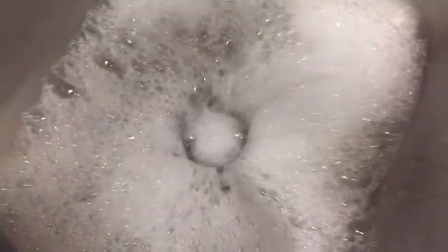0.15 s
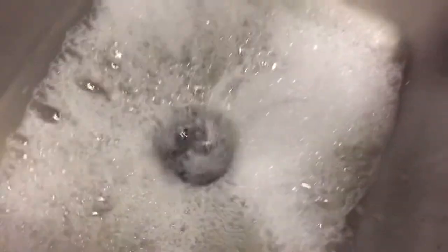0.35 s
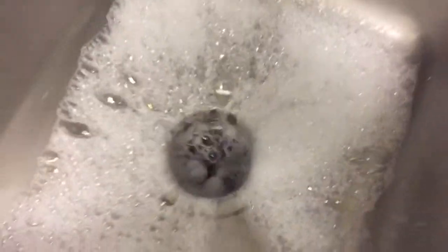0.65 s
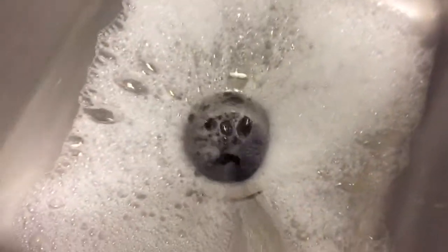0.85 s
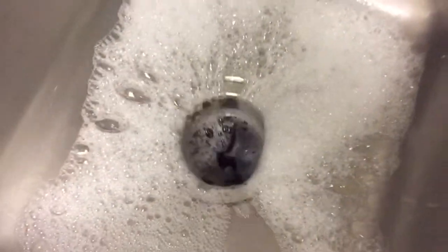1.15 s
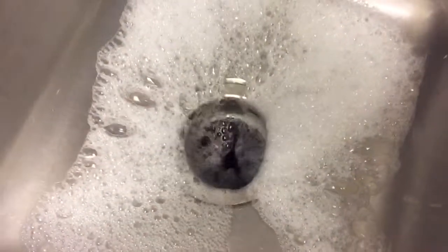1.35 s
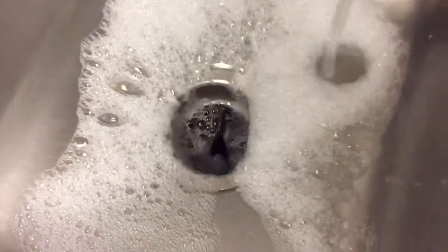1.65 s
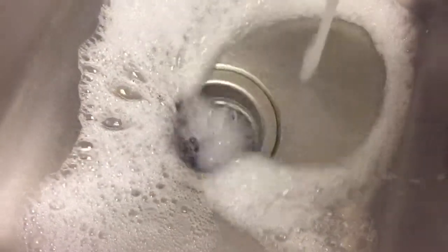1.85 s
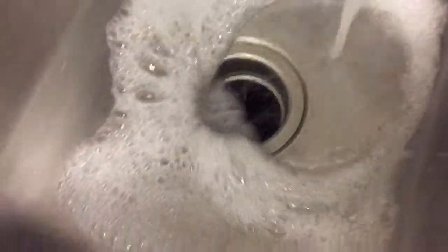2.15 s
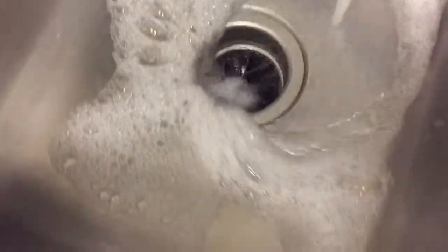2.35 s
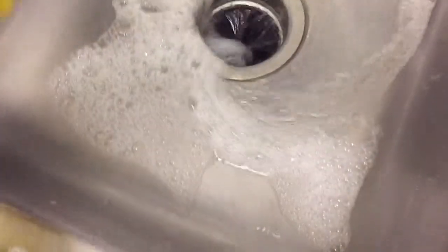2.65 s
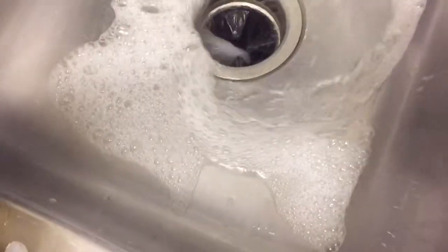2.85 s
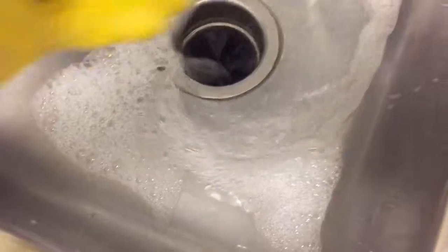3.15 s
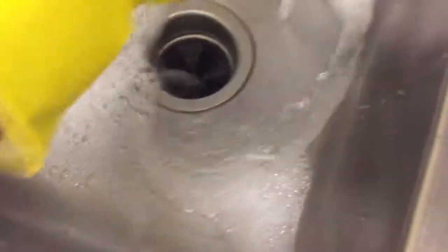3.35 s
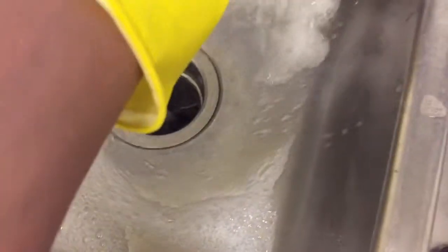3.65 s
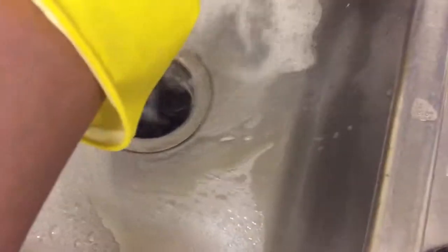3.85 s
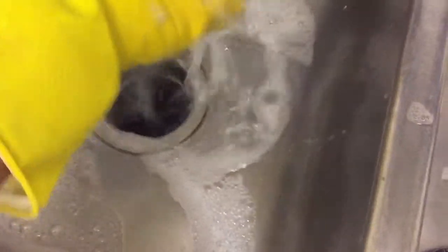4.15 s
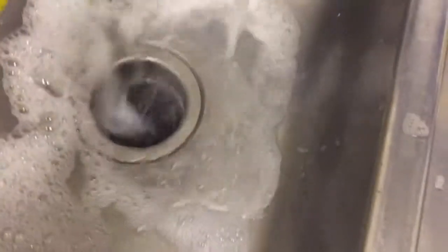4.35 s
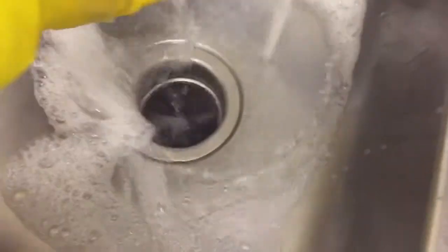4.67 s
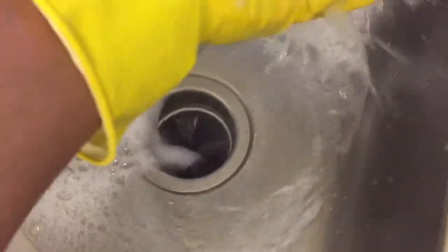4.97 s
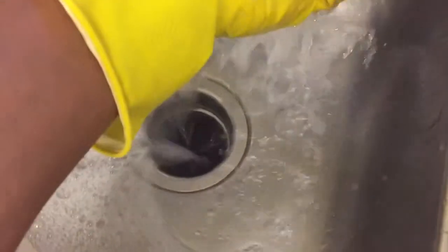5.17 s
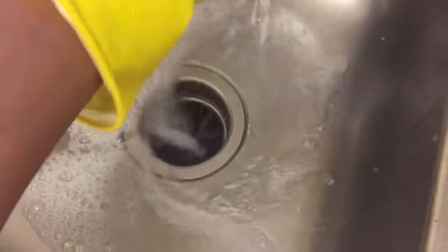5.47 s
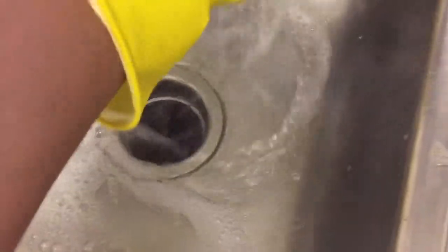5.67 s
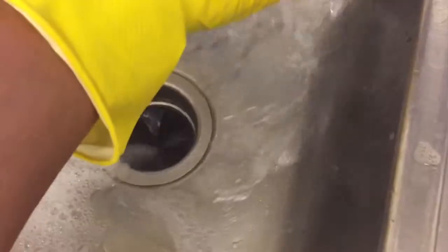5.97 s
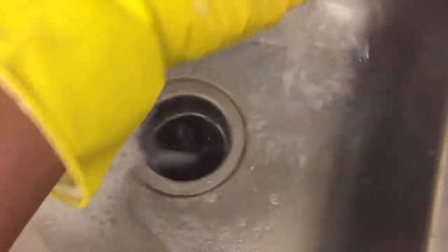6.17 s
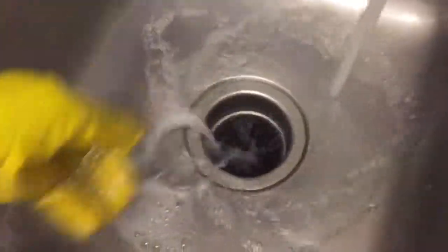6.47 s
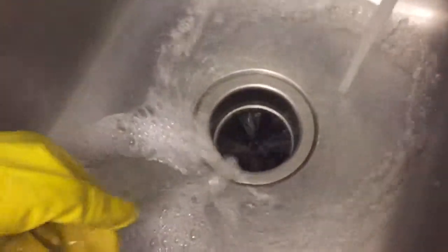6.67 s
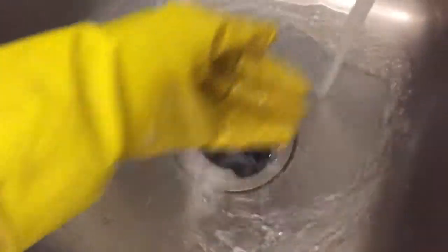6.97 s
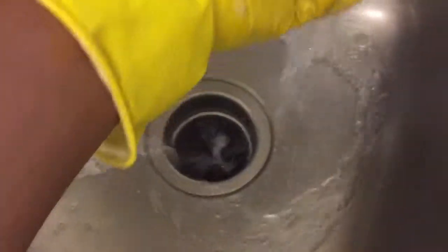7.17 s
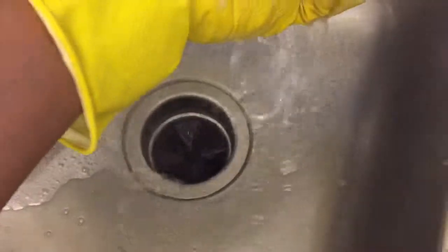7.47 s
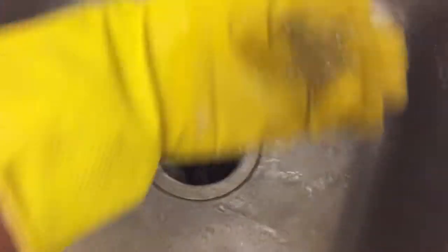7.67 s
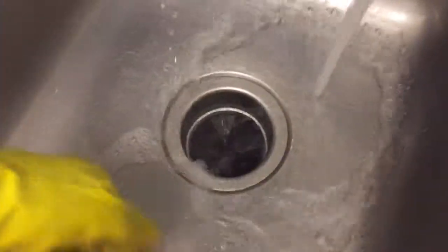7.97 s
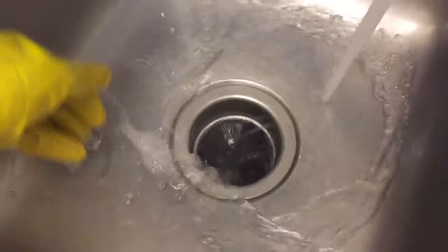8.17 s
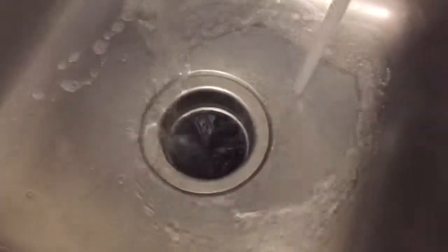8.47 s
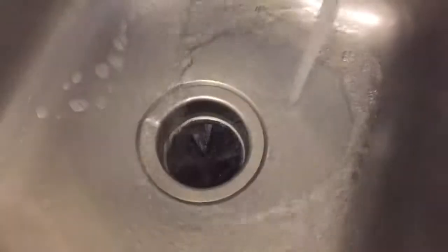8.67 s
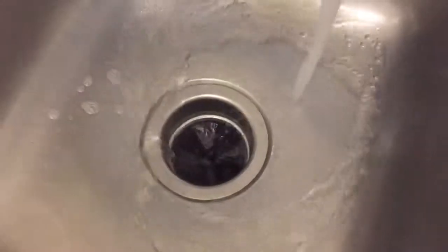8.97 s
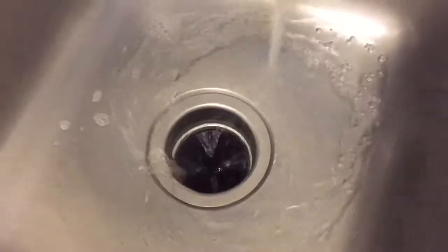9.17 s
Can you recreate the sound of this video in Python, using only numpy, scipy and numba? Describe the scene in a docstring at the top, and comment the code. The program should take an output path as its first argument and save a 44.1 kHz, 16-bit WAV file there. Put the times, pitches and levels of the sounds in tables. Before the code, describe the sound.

Steady electric disposal hum with gurgling, churning water, a sharp crack early on, then wet shredding, slurps and increasingly bright splashing in a metal sink.

```python
"""A garbage disposal runs under a steel sink while the tap pours in. The motor hums at twice the mains rate,
water and fruit churn in the chamber and ring its cavities, and hard pieces crack against the grind ring.
At first foamy water covers the drain and muffles it; as that is sucked away the bright spray comes through.
Sine tones make the hum, the gulps and the ring of the steel; random blows and noise through resonances make
the grinding, slurps, rattle and hiss; shaped noise makes the spray and the snaps."""
import sys
import numpy as np
from scipy import signal
from scipy.fft import rfft, irfft
from scipy.io import wavfile
from scipy.ndimage import uniform_filter1d
from numba import njit

SR = 44100
rng = np.random.default_rng(int(sys.argv[2]) if len(sys.argv) > 2 else 0)


def pcm_store(signal):
    """Save signal as 16-bit PCM."""
    levels = np.round(np.clip(np.atleast_2d(signal), -1, 1) * 32767)
    wavfile.write(sys.argv[1], SR, levels.astype(np.int16).T)


N = 411012
T = np.arange(N) / SR


def undb(db):
    """Decibels to gain."""
    return 10 ** (np.asarray(db) / 20)


def unit(x):
    """Scale to rms 1."""
    return x / np.sqrt(np.mean(x ** 2))


def curves(rows):
    """The columns of a table, joined by straight lines in time."""
    s, *columns = np.transpose(rows)
    return [np.interp(T, s, column) for column in columns]


def add(out, s, sound):
    """Mix a sound in at time s."""
    i = max(int(s * SR), 0)
    out[i:i + len(sound)] += sound[:N - i]


def colour(x, points, size=8192):
    """Causal minimum-phase filter with a spectrum of (Hz, dB) points; rms 1."""
    hz, db = np.transpose(points)
    log_hz = np.log(np.fft.rfftfreq(size, 1 / SR) + 1)
    log_gain = np.log(undb(np.interp(log_hz, np.log(hz), db)))
    cepstrum = irfft(log_gain)[:size // 2]
    cepstrum[1:] *= 2
    response = irfft(np.exp(rfft(cepstrum, size)))
    return unit(signal.fftconvolve(x, response)[:N])


@njit
def svf(x, hz, width):
    """State-variable band-pass whose centre may move."""
    y, band, low = np.empty(len(x)), 0., 0.
    for i in range(len(x)):
        g, k = np.tan(np.pi * hz[i] / SR), width / hz[i]
        v = (band + g * (x[i] - low)) / (1 + g * (g + k))
        band, low, y[i] = 2 * v - band, low + 2 * g * v, k * v
    return y


def resonate(x, hz, width):
    """A resonance with steep skirts: two band-passes in a row."""
    centre = hz + np.zeros(N)
    return svf(svf(x, centre, float(width)), centre, float(width))


def walk(rate):
    """Smooth chance with a spread near 1, drawn afresh at the given rate in Hz."""
    k = int(SR / rate)
    steps = np.repeat(rng.standard_normal(N // k + 1), k)
    return unit(uniform_filter1d(steps, k)[:N])


def impacts(rate, spread_db):
    """Random tiny blows, rate per second, their sizes spread in dB; rms 1."""
    hit = rng.random(N) < rate / SR
    size = undb(spread_db * np.minimum(rng.exponential(size=N), 5))
    return unit(hit * size * np.sign(rng.standard_normal(N)))


def surges(rate, decay_s, depth):
    """Each lump caught by a lug gives a sudden burst that dies away; a gain of rms 1."""
    lumps = np.abs(impacts(rate, spread_db=2.2)) * np.sqrt(rate / SR)
    lumps = np.minimum(lumps, 2)  # no lump is over twice the usual size
    bursts = signal.lfilter([1], [1, -np.exp(-1 / (decay_s * SR))], lumps)
    return unit(1 + depth * unit(bursts))


def burst(noise, s, decay_s):
    """A piece of noise that starts at once and dies away, with the energy of its envelope."""
    fade = np.exp(-T[:SR // 4] / decay_s)
    i = int(s * SR)
    piece = fade * noise[i:i + len(fade)]
    return piece * np.linalg.norm(fade) / np.linalg.norm(piece)


def slurp(rush, hz, width, waver):
    """Rushing noise rings a gap between air and water, whose size keeps changing; rms 1."""
    return unit(resonate(rush, hz * (1 + waver * walk(25)), width))


def ring(x, modes, waver):
    """Several resonances driven together, each retuned by sloshing water; rms 1."""
    total = np.zeros(N)
    for hz, width, db in modes:
        slosh = 1 + waver * walk(14)
        total += undb(db) * resonate(x, hz * slosh, 1.094 * width)  # a little wider than listed
    return unit(total)


def foam(bite):
    """A dense crackle of bubbles and pulp; rms 1."""
    crackle = impacts(rate=3500, spread_db=3.5) + 0.5 * rng.standard_normal(N)
    return unit(bite ** 1.27 * crackle)


def bubbles(hz, rate, spread, cycles, rise):
    """Single bubbles ring near a moving pitch, each gliding up as it dies; rms 1."""
    out, t = np.zeros(N), T[:SR // 40]
    for when, pitch, size in rng.random((int(rate * N / SR), 3)):
        turns = hz[int(when * N)] * (1 + spread * (2 * pitch - 1)) * t
        age = turns / cycles
        swell = np.exp(-age) - np.exp(-4 * age)
        tone = np.sin(2 * np.pi * turns * (1 + rise * age))
        add(out, when * N / SR, undb(-14 * size) * swell * tone)
    return unit(out)


def loads():
    """Each load swells, holds and drains away: the lifts in dB of pulp, air and water."""
    # Water and pulp that slide into the drain, lifting the grinding (pulp), the low note of the mouth (air)
    # and the collar hiss (water). Each layer takes only a share of a lift.
    # Each row: start in seconds, length in seconds, pulp lift in dB, air lift in dB, water lift in dB.
    load_rows = [(0.11, 0.055, 11, 13, -12), (0.415, 0.058, 8, -1, 16), (0.8, 0.77, 9.5, -1, 16.5),
                 (1.763, 0.16, 11, 13, 11), (2.23, 0.14, 9.5, 14, 9), (2.744, 0.24, 3, 15, 8),
                 (2.97, 0.63, 4.5, 13.5, 9), (3.595, 0.33, 3.5, 10, 6.5), (3.898, 0.065, 2, 14, 9),
                 (4.462, 0.38, 3.5, 2.5, 4.5), (4.95, 0.48, 4.5, -6, 4.5), (5.714, 0.28, 7, -2, -1.5),
                 (5.97, 0.25, 8, 2, 4), (6.43, 0.54, 2.5, 7, 6.5), (6.984, 0.052, 16, 13, 11),
                 (7.246, 0.13, 8.5, -2, 6), (7.39, 0.28, 7, -1, 2), (7.686, 0.14, 2.5, 6, 0),
                 (7.78, 0.064, 4, 9, -3), (8.115, 0.18, 2, 8, 4.5), (8.5, 0.13, 1, 14, 3)]
    attack_s, release_s = 0.062, 0.067
    pulp, air, water = np.zeros((3, N))
    for s, length, pulp_db, air_db, water_db in load_rows:
        swell = np.interp(T, [s, s + attack_s], [0, 1])
        drain = np.interp(T, [s + length, s + length + release_s], [1, 0])
        shape = swell * drain
        pulp += pulp_db * shape
        air += air_db * shape
        water += water_db * shape
    return pulp, air, water


def drive(law, lift):
    """Gain of a layer from the depth of the water and the load passing through."""
    # The sink drains, and a sweep of the hand floods the drain again.
    # Each row: time in seconds, water depth from 0 to 1.
    depth_rows = [(0, 0.55), (.7, 0.66), (1.5, 0.62), (2.05, 0.29), (3.9, 0.4), (4.15, 0.47), (4.4, 0.17),
                  (5.6, 0.31), (6.4, 0.1), (7.2, 0.25), (7.9, 0.06), (9.32, 0)]
    empty_db, flooded_db, share = law
    depth, = curves(depth_rows)
    return undb(empty_db + flooded_db * depth + share * lift)


def motor():
    """Magnetic hum at twice the mains rate; the rotor shakes the sink while it is flooded."""
    # The hum sinks around the hardest crack and slowly recovers. Each row: time in seconds, rms level in dB.
    hum_rows = [(0, -18), (1.38, -19.5), (1.59, -23.5), (1.78, -21.5), (2.55, -21.5), (2.9, -19.5),
                (4.1, -19.5), (4.6, -18), (5.1, -18.5), (9.32, -18.5)]
    hum_hz, rotor_hz, rotor_db = 119.96, 55.2, -35.5
    hum_db, = curves(hum_rows)
    hum_level = undb(hum_db + 0.58 * walk(24))
    hum = hum_level * np.sin(2 * np.pi * hum_hz * T + 0.06 * walk(7.4))
    flooded = np.interp(T, [.65, 1.2], [1, .12])
    shake = undb(rotor_db + 2 * walk(24)) * flooded * np.sin(2 * np.pi * rotor_hz * T)
    return np.sqrt(2) * (hum + shake)


def grinding(pulp, air, bite):
    """Bits of fruit pelt the chamber and ring its cavities and the air in the drain mouth."""
    # Cavities of the grinding chamber. Each row: pitch in Hz, nominal width in Hz, level in dB.
    cavities = [(475.3, 25.7, 2.5), (586.3, 53, -4), (635.6, 77, 2), (728, 46, -6.5), (908.6, 97, -1.5),
                (1291, 125, -10), (1614, 118, -5)]
    # The upper resonance drifts higher as the mouth clears. Each row: time in seconds, pitch in Hz.
    mouth_pitch = [(0, 1740), (.75, 1780), (.95, 1730), (1.45, 1790), (3.2, 1844), (4.8, 1820), (5.7, 1827),
                   (6.2, 1853), (9.32, 1847)]
    # Foam smothers the mouth at first, and again whenever more is washed in.
    # Each row: time in seconds, gain of the upper note from 0 to 1.
    mouth_clear = [(.6, 0.25), (.78, 0.97), (1.5, 1), (1.7, 0.4), (2.05, 0.4), (2.65, 0.6), (2.95, 0.9),
                   (3.98, 1), (4.15, 0.8), (4.4, 1)]
    # Layer answers for chamber, lower note and upper note.
    # Each holds: level in the empty sink in dB, change under full depth in dB, share of a load's lift.
    grind_law = (-32, -1.1, 0.26)
    lower_law = (-45, -4, 0.74)
    upper_law = (-36, -7.5, 0.79)
    blows = bite * (impacts(rate=1100, spread_db=2.5) + 0.58 * rng.standard_normal(N))
    chamber = ring(blows, cavities, waver=0.024) * drive(grind_law, pulp)
    slosh = 1 + 0.026 * walk(16)  # moving water keeps retuning the mouth
    lower = unit(resonate(blows, 1280 * slosh, width=156)) * drive(lower_law, air)
    upper_hz, = curves(mouth_pitch)
    opened, = curves(mouth_clear)
    flutter = bubbles(upper_hz, rate=160, spread=0.055, cycles=9, rise=0.0016)
    note = unit(resonate(blows, upper_hz * slosh, width=138))
    upper = opened * unit(note + undb(0.5) * flutter) * drive(upper_law, pulp)
    return chamber + lower + upper


def churning(pulp):
    """Water is beaten round the tub in dull thumps."""
    # Spectrum of the tub full of water. Each row: frequency in Hz, level in dB.
    tub_spectrum = [(25, -39), (45, -25), (62, -9.5), (84, -6), (100, -5.5), (135, -6.5), (184, 5),
                    (225, -8), (275, -4), (320, -10), (410, -13.5), (600, -20.5), (1100, -31.5),
                    (3000, -76)]
    # Level in the empty sink in dB, change under full depth in dB, share of a load's lift.
    churn_law = (-25, 5.9, 0.21)
    return drive(churn_law, pulp) * colour(impacts(rate=900, spread_db=1.5), tub_spectrum)


def cracks(tail_db=-17, tail_s=0.051):
    """A hard piece snaps, and the blow rings the plate and basin."""
    # Hard pieces that strike the grind ring. Each row: time in seconds, snap level in dB, steel ring level in dB.
    strikes = [(1.472, -18, -31), (1.490, -27, -35), (1.512, -27, -33), (1.543, -27, -23), (1.595, -9, -15),
               (1.687, -26, -44), (1.793, -27, -33)]
    # Ring of the grind plate and basin. Each row: pitch in Hz, level in dB, 60 dB decay time in seconds.
    steel_modes = [(170, -3, .17), (342, -4, .2), (491, 7, 0.13), (620, 2.5, 0.04), (730, 9.5, 0.07),
                   (800, -4, .07), (1105, -12, 0.36), (1330, -8.5, 0.19), (1610, -11, .07),
                   (1945, -23, 0.23), (2655, -16, .2), (2240, -9, .04)]
    # Spectrum of the snap. Each row: frequency in Hz, level in dB.
    snap_spectrum = [(100, -20), (400, 2), (1000, 12.5), (1400, 5), (1800, 9), (2200, 7), (2750, 7.5),
                     (3200, 3), (3600, 8), (4200, 4.5), (5200, -1), (6200, -2), (8000, -7), (15000, -8)]
    ring_lag_s = 0.00234  # the steel answers just after the snap
    out, t = np.zeros(N), T[:SR // 4]
    crunch = colour(rng.standard_normal(N), snap_spectrum)
    for s, snap_db, ring_db in strikes:
        snap = burst(crunch, s, decay_s=.006)
        tail = undb(tail_db) * burst(crunch, s, tail_s)
        # each blow lands on another spot and shares itself differently among the modes
        steel = np.zeros(len(t))
        for hz, db, t60 in steel_modes:
            fade = undb(db + rng.normal() - 60 * t / t60)
            steel += fade * np.sin(2 * np.pi * hz * t) * rng.choice([-1, 1])
        add(out, s, undb(snap_db) * (snap + tail))
        add(out, s + ring_lag_s, undb(ring_db) * steel * (1 - np.exp(-t / 0.0011)))
    return out


def shreds(attack_s=0.00057):
    """A lug tears through a soft piece: a short rasp of tiny blows rings the mouth and the collar."""
    # Soft pieces shredded under the open mouth.
    # Each row: start in seconds, level in dB, decay in seconds, collar level against the mouth in dB.
    pieces = [(0.128, -26.5, 0.011, -17), (0.8035, -20.5, 0.0057, -16), (0.829, -25, .008, -13),
              (2.387, -23, .007, -6), (2.826, -21, 0.006, -4), (2.914, -30, .008, -4),
              (3.044, -20, 0.0083, 1.5), (3.137, -22.5, 0.01, 0), (3.158, -20.5, 0.0056, -0.5),
              (3.186, -17, 0.0085, -6), (3.227, -16.5, 0.0055, -6), (3.472, -23, 0.0094, -1),
              (3.492, -24.5, 0.016, 0), (3.551, -21.5, 0.014, -1), (3.620, -19, 0.013, -8),
              (3.740, -19, 0.018, -6), (3.828, -18, 0.006, -7), (3.922, -19.5, 0.008, -5),
              (3.975, -23, 0.013, -4), (4.036, -22, 0.0057, -13), (4.34, -22.5, 0.0065, -12),
              (5.17, -25, .007, -6), (5.291, -19, .007, -7), (5.97, -18, .007, -17),
              (6.046, -22, 0.008, -5), (6.153, -14.5, 0.01, -4), (6.686, -24.5, 0.0068, -3),
              (7.163, -23.5, .01, -2), (7.432, -20, 0.012, 2), (7.554, -17, 0.0082, 1.5),
              (7.7993, -20, 0.0057, -6), (7.840, -19, .005, -9), (7.848, -16, 0.006, -1.5),
              (8.446, -22.5, .007, -4), (8.55, -22, 0.0091, -5)]
    # What a piece rings, in the mouth and in the collar. Each row: pitch in Hz, nominal width in Hz, level in dB.
    mouth_modes = [(895, 120, -5), (1322, 230, 1), (1693, 130, 2.5), (1822, 114, 5.5), (1956, 86, 1)]
    collar_modes = [(2610, 450, 0.5), (3404, 130, 4), (3720, 210, 10), (5140, 1400, -18), (6160, 1600, 6.5),
                    (7970, 2200, 3.5)]
    out, rasp = np.zeros(N), impacts(rate=4000, spread_db=2.5)
    mouth = ring(rasp, mouth_modes, waver=0.036)
    collar = ring(rasp, collar_modes, waver=0.036)
    attack = 1 - np.exp(-T[:SR // 4] / attack_s)
    for s, db, decay_s, bright_db in pieces:
        torn = burst(mouth, s, decay_s) + undb(bright_db) * burst(collar, s, decay_s)
        add(out, s, undb(db) * attack * torn)
    return out


def gulps(glide=1.8):
    """Swallowed pockets of air and soft lumps each ring for a few cycles, rising a little."""
    # Each row: start in seconds, starting pitch in Hz, level before the soft onset in dB, 60 dB decay in seconds.
    pockets = [(0.145, 174, -12, .1), (1.547, 296, -0.5, 0.03), (3.495, 199, -9, 0.092),
               (3.986, 190, -11, 0.098), (6.160, 197, -7.5, 0.06), (6.205, 196, -11, 0.1),
               (7.655, 457, -19, 0.063), (7.995, 554, -15.5, .05), (8.352, 568, -11, 0.058),
               (8.571, 994, -3, 0.032), (8.572, 1230, -11, 0.02), (8.573, 760, -16, .025)]
    out, t = np.zeros(N), T[:SR // 8]
    for s, hz, db, t60 in pockets:
        envelope = undb(db - 60 * t / t60) * (1 - np.exp(-t / 0.002))
        add(out, s, envelope * np.sin(2 * np.pi * hz * t * (1 + glide * t)))
    return out


def vortex():
    """Air slurps and bubbles through two gaps in the foam; the higher one climbs as the water runs off."""
    # The wider gap, which gurgles as the drain first opens, then the narrower gap that opens in the vortex.
    # Each row: time in seconds, resonance in Hz, level in dB.
    wide_gap = [(0, 890, -35), (.41, 875, -52), (.465, 860, -30), (.6, 940, -30), (.7, 1010, -36),
                (.82, 1040, -36), (.95, 1064, -39), (1.6, 1060, -70)]
    narrow_gap = [(0, 3000, -46.5), (.3, 2890, -47), (.5, 3000, -44), (.76, 2970, -44.5), (.88, 3260, -39),
                  (1.1, 3940, -40), (1.24, 3880, -38.5), (1.36, 4300, -36.5), (1.55, 4420, -42),
                  (1.9, 4720, -54)]
    low_hz, low_db = curves(wide_gap)
    high_hz, high_db = curves(narrow_gap)
    rush = rng.standard_normal(N)
    gurgle = slurp(rush, low_hz, width=280, waver=0.05)
    overtone = undb(-2.5) * slurp(rush, 1.24 * low_hz, width=160, waver=0.03)
    low_bubbles = undb(-3) * bubbles(low_hz, rate=330, spread=0.16, cycles=8.1, rise=0.008)
    low = gurgle + overtone + low_bubbles
    high_bubbles = undb(-2) * bubbles(high_hz, rate=400, spread=.15, cycles=12, rise=.008)
    high = high_bubbles + slurp(rush, high_hz, width=1700, waver=0.04)
    return undb(low_db) * unit(low) + undb(high_db) * unit(high)


def rattle(water, bite):
    """Pulp crackles on the drain collar; once that is uncovered a water film hisses and sheds bubbles."""
    # Ring of the drain collar. Each row: pitch in Hz, nominal width in Hz, level in dB.
    collar_modes = [(2634, 350, 0.5), (3356, 160, 5), (3700, 210, 6.5), (4800, 690, 1), (5480, 420, 3.5),
                    (5930, 310, -4), (6470, 780, 5)]
    # Spectrum of the pulp rattle. Each row: frequency in Hz, level in dB.
    rattle_spectrum = [(900, -8), (2000, 0), (2300, 8.5), (2700, 2), (3050, 7), (3600, 3.5), (4400, 5.5),
                       (5200, -36), (6500, -30), (9500, -19), (15000, -42)]
    # Layer answers for pulp and film.
    # Each holds: level in the empty sink in dB, change under full depth in dB, share of a load's lift.
    rattle_law = (-40, -11.5, 0.61)
    film_law = (-34, -32, 0.74)
    crackle = ring(foam(bite), collar_modes, waver=0.025) + undb(3.0) * foam(bite)
    pulp = colour(crackle, rattle_spectrum)
    sheet = ring(foam(bite), collar_modes, waver=0.026) + undb(-3.0) * foam(bite)
    hiss = slurp(sheet, 5660, width=4500, waver=0.043)
    large = bubbles(np.full(N, 3620.), rate=110, spread=0.081, cycles=16, rise=0.0016)
    small = bubbles(np.full(N, 5650.), rate=140, spread=0.178, cycles=19, rise=0.0022)
    film = unit(hiss + undb(-5) * large + undb(-3) * small)
    uncovered = np.interp(T, [1.5, 1.85], [.1, 1])
    return pulp * drive(rattle_law, water) + uncovered * film * drive(film_law, water)


def throat(water, bite):
    """The shallower the water, the more strongly the falling stream rings the open drain."""
    # What the stream rings in the drain. Each row: pitch in Hz, nominal width in Hz, level in dB.
    drain_modes = [(983, 86, 0), (1960, 115, 9), (2710, 280, -0.5), (3400, 110, 3), (3840, 410, 0),
                   (5670, 200, 2.5)]
    # Level in the empty sink in dB, change under full depth in dB, share of a load's lift.
    throat_law = (-36, -28, 0.41)
    return ring(foam(np.sqrt(bite)), drain_modes, waver=0.015) * drive(throat_law, water)


def swishes(bite, relative_width=0.13, waver=.012, attack_s=0.032, release_s=0.064):
    """A sheet of water narrows the air gap at the collar, which rings with the fizz until it has passed."""
    # Sheets of water over the collar, each with its own gliding pitch.
    # Each row: start in seconds, length in seconds, start pitch in Hz, end pitch in Hz, level in dB.
    sheets = [(2.238, 0.13, 8200, 8500, -34), (3.927, 0.05, 1420, 1230, -30), (2.8, 0.5, 5900, 6000, -39.5),
              (3.307, 0.2, 6000, 5900, -35), (4.45, 0.55, 3500, 3720, -39.5), (4.48, .35, 5300, 5170, -43),
              (6.01, 0.21, 6500, 6300, -33.5), (6.008, 0.14, 4830, 4940, -38),
              (6.29, 0.075, 3650, 3700, -42), (6.427, 0.11, 6200, 5040, -36),
              (6.618, .35, 5500, 5400, -36.5), (6.718, 0.16, 4750, 4650, -35.5),
              (7.244, 0.22, 6450, 6400, -33), (7.396, 0.24, 5000, 5100, -33), (7.41, 0.3, 5600, 5600, -37),
              (7.418, 0.326, 3870, 3470, -40.5), (7.804, 0.065, 5900, 5850, -34),
              (8.11, 0.14, 5650, 5550, -33.5), (8.615, 0.13, 6400, 6500, -32),
              (8.63, 0.13, 3850, 3870, -36), (8.65, 0.58, 2680, 2740, -44),
              (8.837, 0.34, 5330, 5400, -37.5), (9.095, 0.11, 6500, 6540, -29)]
    out, fizz, slosh = np.zeros(N), foam(bite), 1 + waver * walk(25)
    for s, length, start_hz, end_hz, db in sheets:
        span = slice(int(s * SR), int((s + length + release_s) * SR))
        t = T[span] - s
        hz = np.interp(t, [0, length], [start_hz, end_hz]) * slosh[span]
        width = relative_width * start_hz
        shape = np.clip(t / attack_s, 0, 1) * np.interp(t, [length, length + release_s], [1, 0])
        swish = unit(svf(svf(fizz[span], hz, width), hz, width))
        add(out, s, undb(db) * shape * swish)
    return out


def splashes():
    """Bursting foam and slugs of water flung against the baffle: short bright bursts of noise."""
    # Each row: start in seconds, level before the quick onset in dB, decay in seconds.
    slugs = [(.282, -37, 0.0016), (.303, -39, .003), (0.323, -32, 0.0018), (.342, -39, 0.0018),
             (.577, -39, .003), (1.311, -28, .005), (1.4, -27, .005), (1.240, -27, .005),
             (3.149, -26, 0.0076), (3.359, -22, 0.013), (3.491, -19.5, 0.019), (4.682, -20, .002),
             (5.477, -21, .005), (6.048, -20, .003), (6.62, -21, .005), (6.889, -17.5, 0.0053),
             (8.363, -16, 0.016), (8.643, -21, 0.014), (8.657, -20, 0.019), (8.859, -17, .005)]
    swell, t = np.zeros(N), T[:SR // 10]
    for s, db, decay_s in slugs:
        add(swell, s, undb(db) * np.exp(-t / decay_s) * (1 - np.exp(-t / 0.00027)))
    bright = [(400, 6.3), (2000, 11.7), (4300, 5.8), (6200, 8), (9000, 15.3), (11000, 12.4), (15000, 7.4)]
    return swell * colour(rng.standard_normal(N), bright)


def spray(water, bite):
    """The tap stream and flung water fizz on the steel; tiny bubbles ping in it."""
    # Spectra of the open spray and of the fizz while foam covers the drain.
    # Each row: frequency in Hz, level in dB.
    open_spectrum = [(500, -5), (1100, -7.5), (1700, 1), (2200, -5), (3100, -8), (3700, -12.5),
                     (4400, -8.5), (7100, -2.5), (8400, 1.5), (9200, 2), (10450, -3.5), (11100, 1),
                     (12500, 1), (13400, 0), (13900, 4), (14500, -0.5), (15300, 0.5)]
    smothered_spectrum = [(500, -5), (2000, 18.5), (4000, 2), (5600, 4.5), (7000, 2.5), (9200, 1),
                          (10300, -10), (12500, -5), (15300, -10)]
    # The spray comes through as the foam clears, with a step as the tap stream arrives.
    # Each row: time in seconds, level in dB.
    level_rows = [(0, -44.5), (.19, -51.5), (.32, -42.5), (.48, -43.5), (.68, -46.5), (.79, -44),
                  (.86, -46), (1.02, -43.5), (1.3, -42.5), (1.52, -40), (1.66, -42), (1.71, -33.5),
                  (2.6, -31.5), (3.4, -30), (4.1, -29.5), (4.35, -28.5), (7.2, -27.5), (9.32, -25)]
    fizz = impacts(rate=2500, spread_db=-2.0) + 2.0 * rng.standard_normal(N)
    drops = fizz * bite ** 0.34 * undb(0.36 * walk(40))
    pings, t = np.zeros(N), T[:SR // 50]
    for when, pitch, size in rng.random((1500, 3)):
        hz = 7000 + 8000 * pitch
        ping = np.exp(-t * hz / 18) * np.sin(2 * np.pi * hz * t)
        add(pings, when * N / SR, undb(-22 * size ** .5) * ping)
    open_air = colour(drops, open_spectrum) + undb(-14.0) * unit(pings)
    pops = surges(rate=110, decay_s=.003, depth=.45)
    bursting = rng.standard_normal(N) * pops * undb(1.5 * walk(45))
    smothered = undb(3.5) * colour(bursting, smothered_spectrum)
    covered = np.interp(T, [.8, 1.1, 1.65, 1.72], [0.98, 0.21, 0.048, 0])
    spray_db, = curves(level_rows)
    level = undb(spray_db + 0.23 * water)  # the spray takes this share of a load's water lift
    return (covered * smothered + (1 - covered) * open_air) * level


def basin(x, wet_db=-14, t60=0.046):
    """Close reflections between the steel walls."""
    t = T[:SR // 4]
    echo = rng.standard_normal(len(t)) * undb(-60 * t / t60) * (t > .002)
    return x + undb(wet_db) * signal.fftconvolve(x, echo / np.linalg.norm(echo))[:N]


def scene():
    """The same loads and lumps drive grinding, rattle and spray together."""
    pulp, air, water = loads()
    bite = surges(rate=110, decay_s=0.0048, depth=0.65)
    wet = grinding(pulp, air, bite) + shreds() + gulps() + vortex()
    wet += rattle(water, bite) + throat(water, bite) + swishes(bite)
    wet += splashes() + spray(water, bite)
    return (motor() + churning(pulp) + cracks() + basin(wet))[None]


def record(dry):
    """The microphone rounds the highest peaks; the deepest bass and the top are cut."""
    rounded = dry / (1 + (dry / .75) ** 6) ** (1 / 6)
    lean = signal.sosfilt(signal.butter(2, 32, "high", fs=SR, output="sos"), rounded)
    return signal.sosfilt(signal.ellip(12, .1, 80, 15400, fs=SR, output="sos"), lean)


dry = scene()
out = record(dry)
pcm_store(out)
```